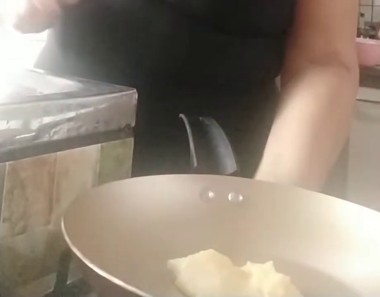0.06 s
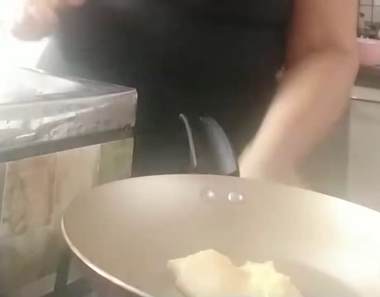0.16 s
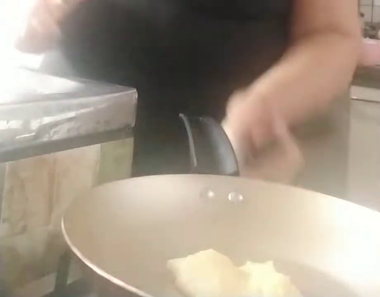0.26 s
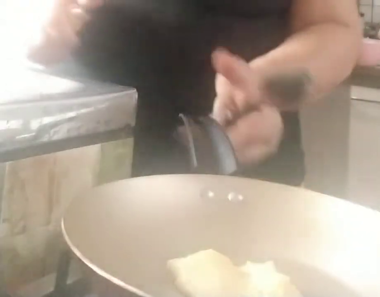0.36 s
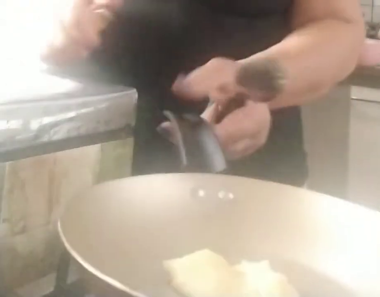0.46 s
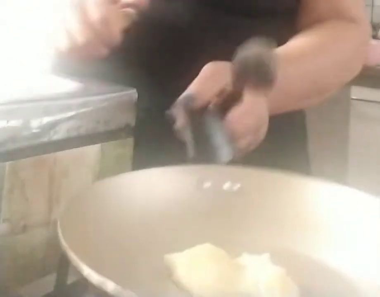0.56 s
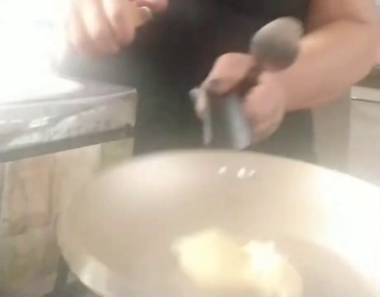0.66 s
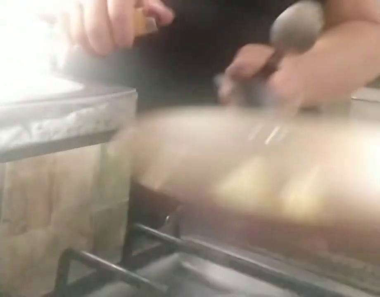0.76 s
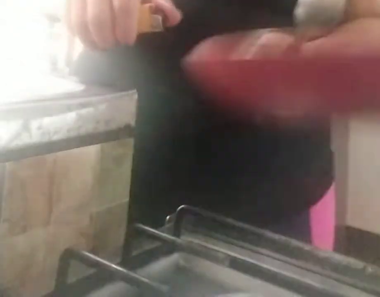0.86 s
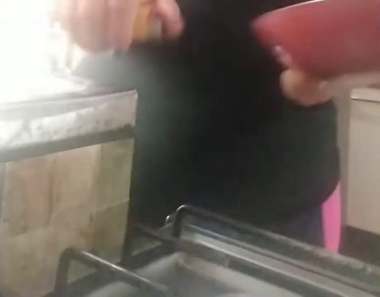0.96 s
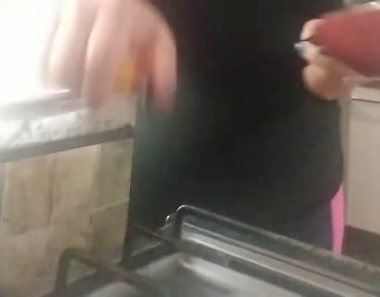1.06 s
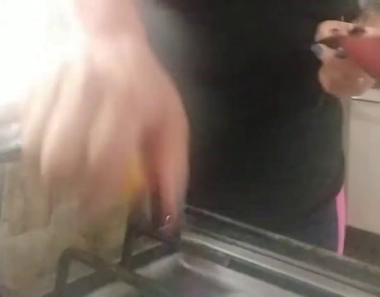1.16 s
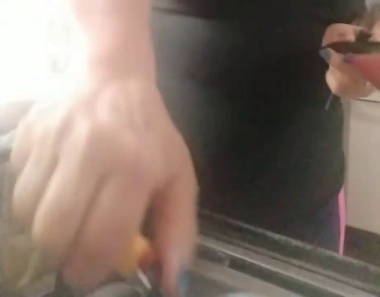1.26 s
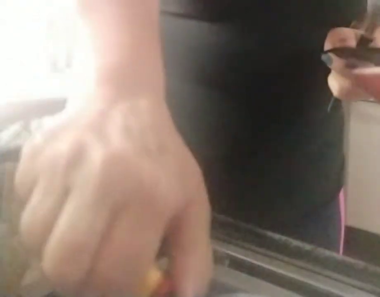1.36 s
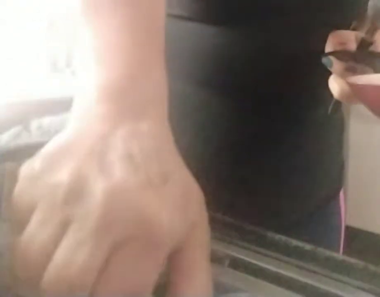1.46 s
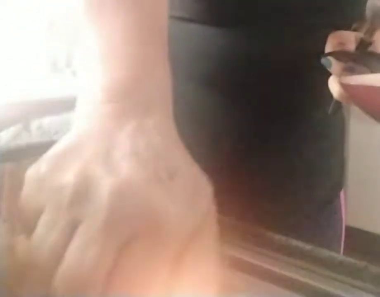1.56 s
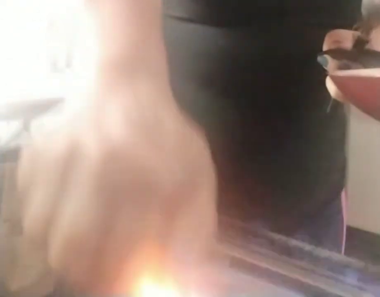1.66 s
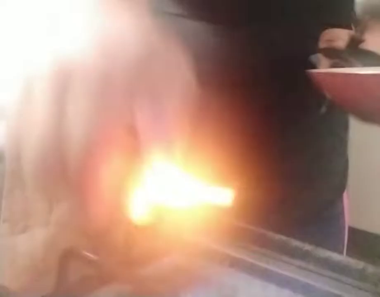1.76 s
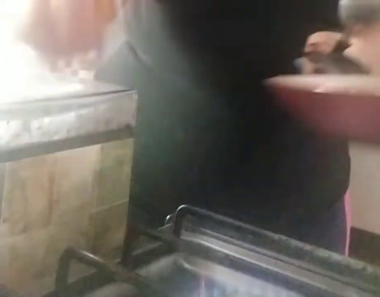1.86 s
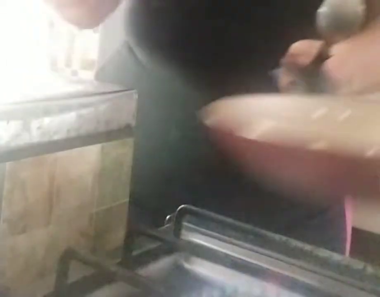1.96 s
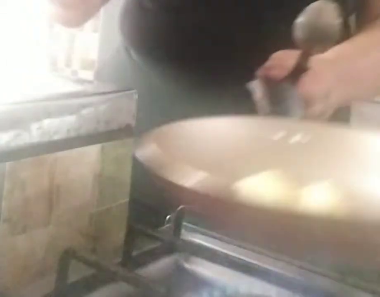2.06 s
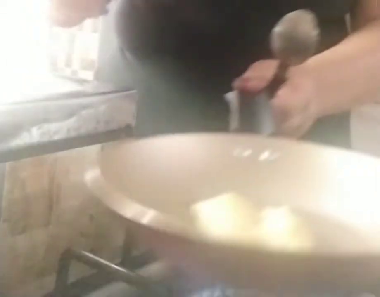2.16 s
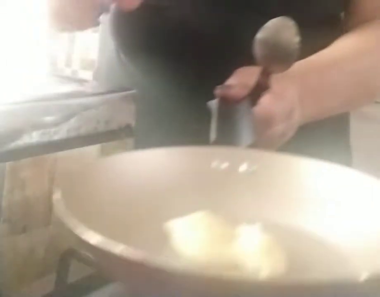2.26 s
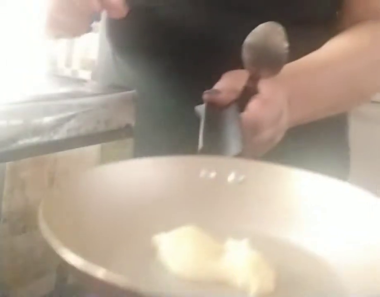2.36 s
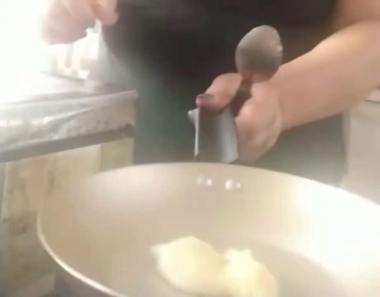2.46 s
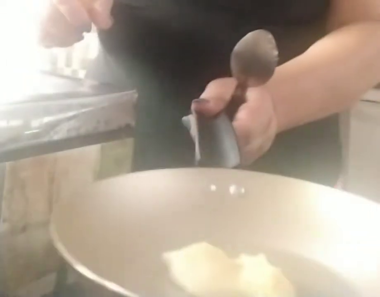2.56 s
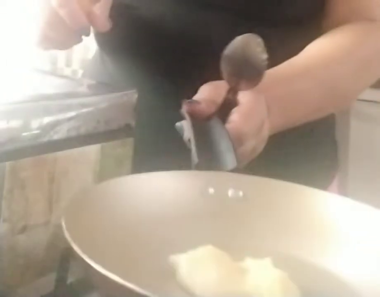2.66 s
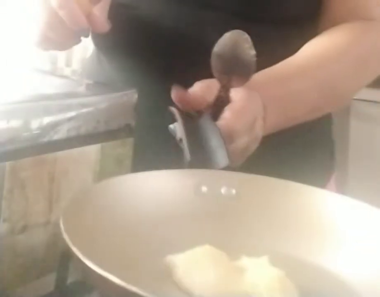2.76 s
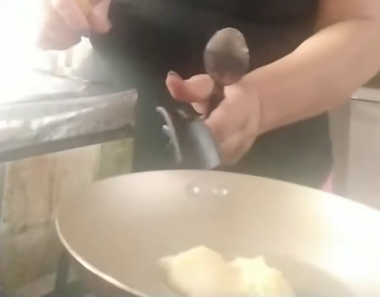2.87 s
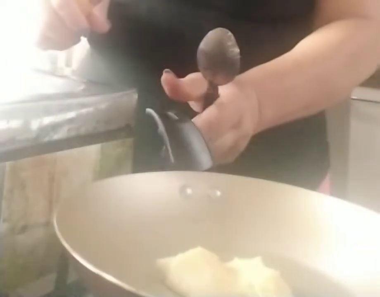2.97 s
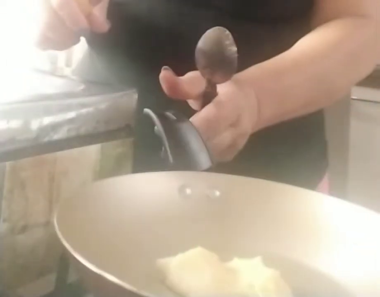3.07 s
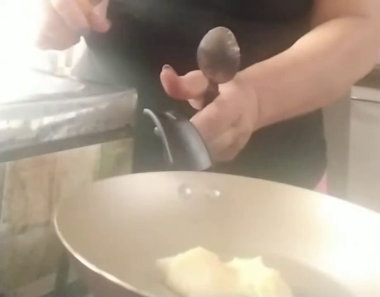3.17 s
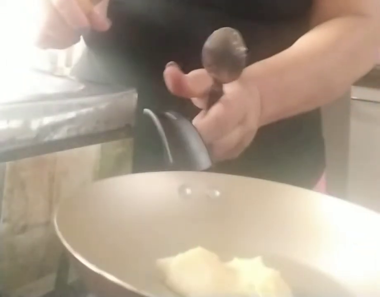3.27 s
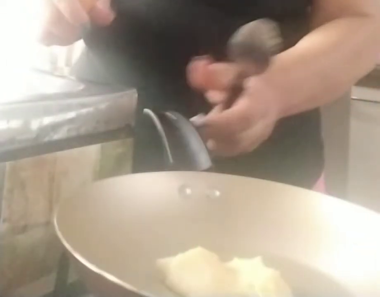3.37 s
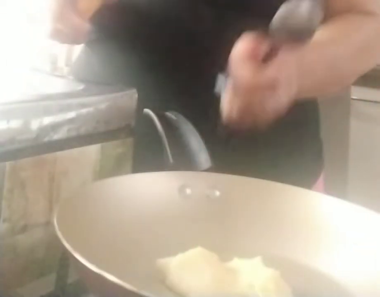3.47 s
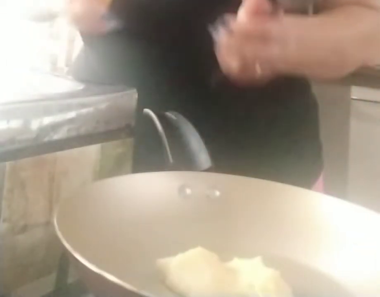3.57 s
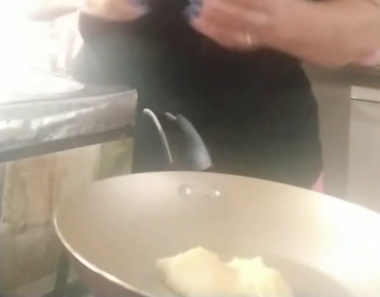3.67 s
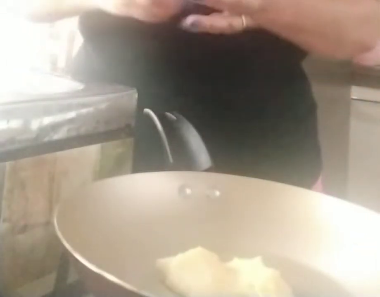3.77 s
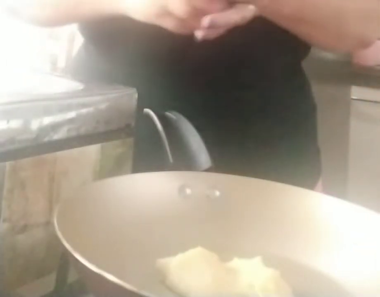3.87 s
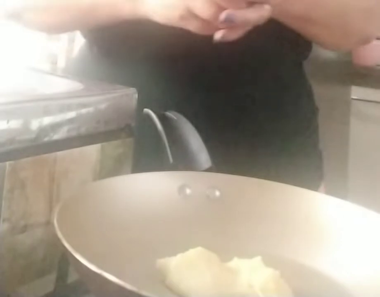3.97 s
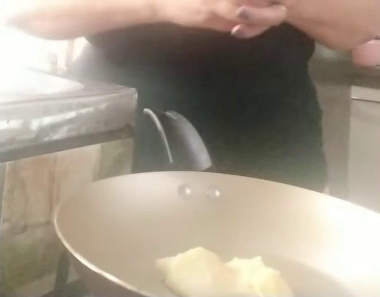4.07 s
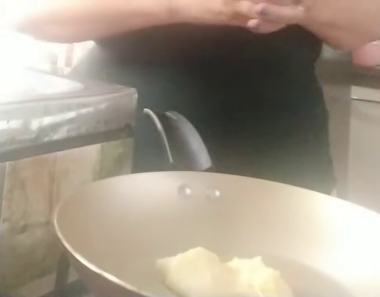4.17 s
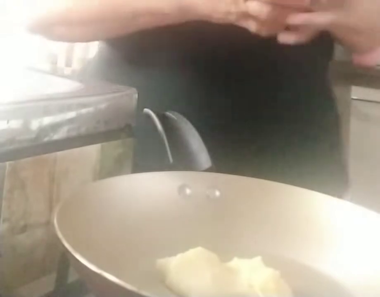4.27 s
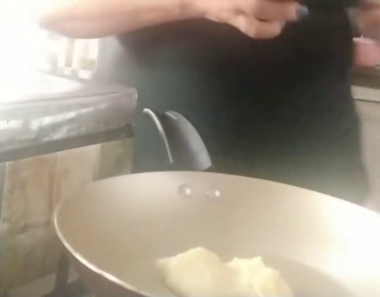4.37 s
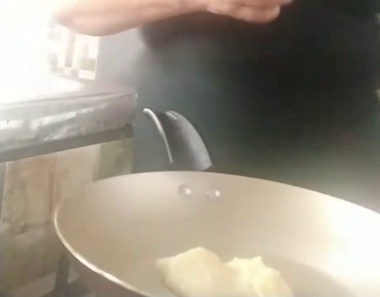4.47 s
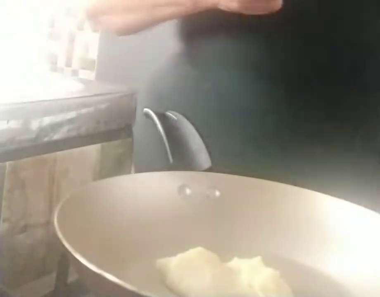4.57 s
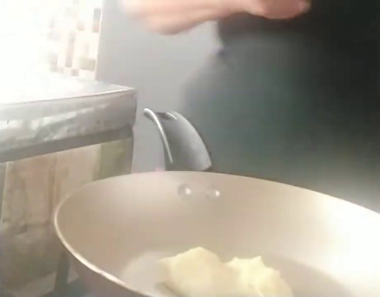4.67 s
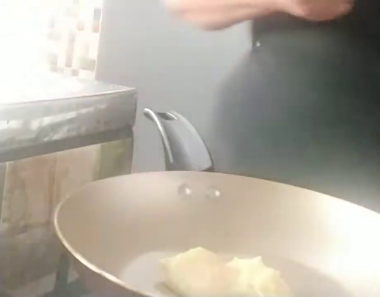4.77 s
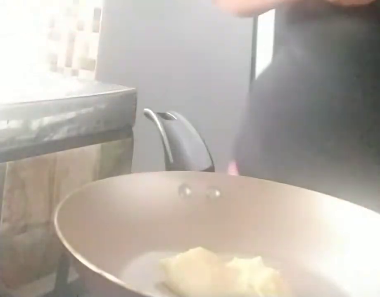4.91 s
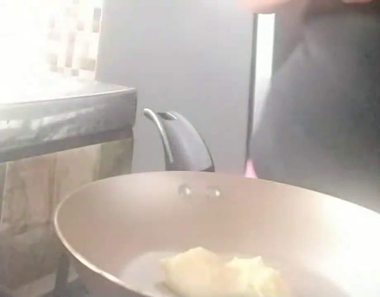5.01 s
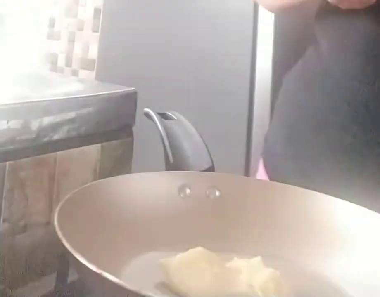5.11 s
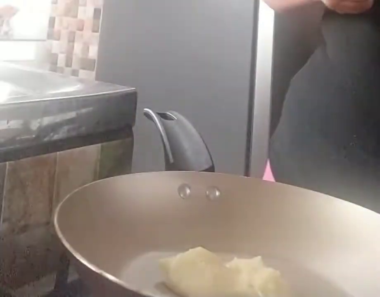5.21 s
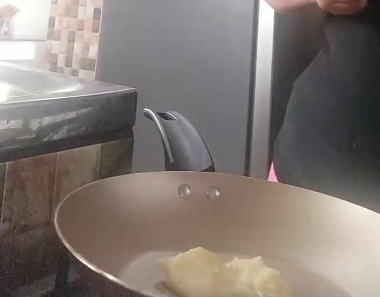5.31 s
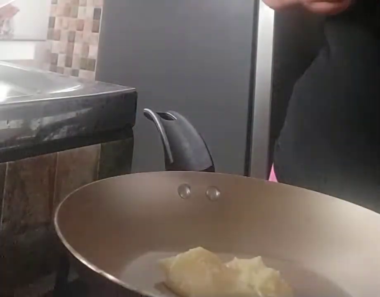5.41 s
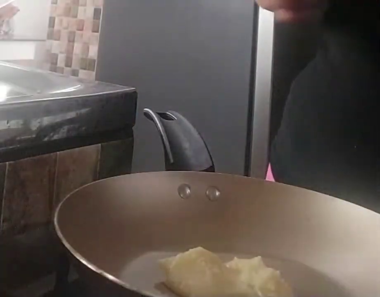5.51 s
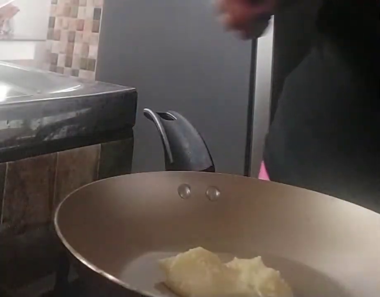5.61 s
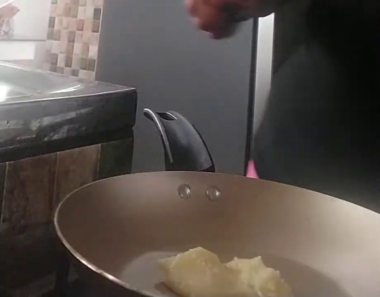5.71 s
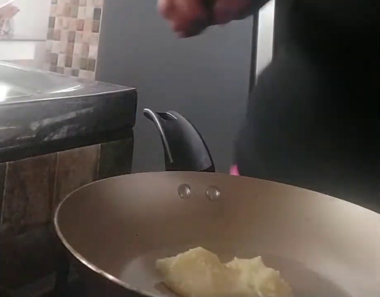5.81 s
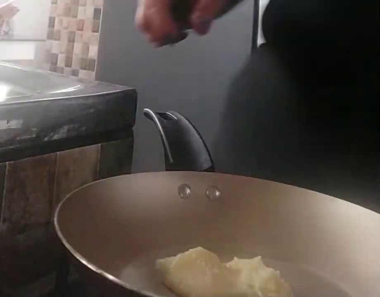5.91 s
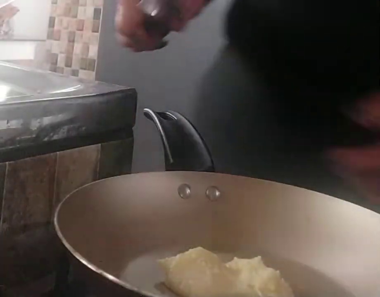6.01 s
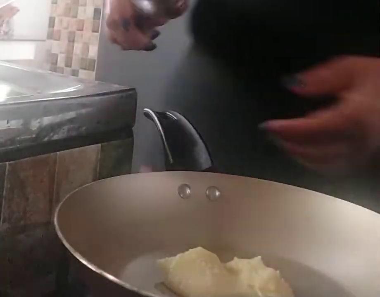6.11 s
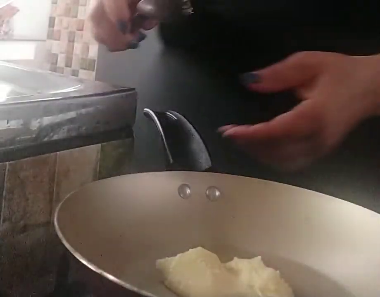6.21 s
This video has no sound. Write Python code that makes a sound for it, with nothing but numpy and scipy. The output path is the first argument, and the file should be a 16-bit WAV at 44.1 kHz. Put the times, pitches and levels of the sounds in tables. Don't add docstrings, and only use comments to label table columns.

```python
import sys
import numpy as np
from scipy import signal
from scipy.fft import rfft, irfft
from scipy.io import wavfile

SR = 44100
rng = np.random.default_rng(int(sys.argv[2]) if len(sys.argv) > 2 else 0)


def amplitude_ratio(level_db):
    exponent = np.asarray(level_db, float) / 20
    return 10 ** exponent


def digitize_waveform(pressure):
    field = np.atleast_2d(pressure).T
    bounded = np.clip(field, -1, 1)
    quanta = np.round(bounded * 32767).astype(np.int16)
    wavfile.write(sys.argv[1], SR, quanta)


N = 275625
TIME_S = np.arange(N) / SR

# start in seconds, peak in dB.
FLINT_SNAPS = [
    (1.578, -19),
    (1.5818, -3.5),
]
FLINT_CRACK_HZ, FLINT_BODY_HZ, FLINT_DULL_DB, FLINT_CONTACT_MS = 8400, 5650, 1.5, 6.5
GRIND_START_S, GRIND_LENGTH_S, GRIND_DB, GRIND_RISE_DB_PER_S = 1.527, 0.051, -47, 224
THUMB_RUB_DB = -1
SPARK_START_S, SPARK_DB, SPARK_FADE_DB_PER_S = 1.595, -33, 154

# swell in seconds, level in dB, fade in dB per second.
FLAME_POP = (0.015, -33.5, 177)
CATCH_S, SWELL_S, BURN_S, PUFF_DB, PUFF_FADE_DB_PER_S = 1.592, 0.024, 0.036, -33.5, 227
PUFF_EDGE_HZ, PUFF_ROLL_HZ, PUFF_CLIMB_OCT_PER_S, PUFF_CLIMB_S = 62, 300, 19, 0.105

# start in seconds, clack peak in dB, thump in dB, edge in dB, left-right in dB.
BLOWS = [(0.139, -35.5, -30.5, -31, -0.5), (0.436, -28.5, -39, -39, 0), (1.283, -27, -41, -29.5, 4),
         (1.29, -29, -32, -33, 4), (1.299, -38, -24, -50, -1), (2.461, -21, -45, -17.5, 5),
         (2.655, -19.5, -48, -24, 3.5), (2.667, -21, -37, -22.5, -5), (2.691, -45, -29, -53, 10),
         (2.713, -51, -47, -50, 4), (2.968, -33, -43, -57, 2), (3.01, -54, -37, -55, 7)]
BLOW_CONTACT_MS = 13

# frequency in Hz, level in dB, t60 in seconds.
PAN_MODES = [(163, -7.5, 0.083), (306, -8.5, 0.053), (338.4, -10.5, 0.13), (415, -15, 0.17),
             (933, -14, 0.27), (993, -8, 0.16), (1114, -9, 0.052), (1393, -15.5, 0.051),
             (2028, -6.5, 0.057), (2708, -1, 0.027), (2790, -6, 0.027), (3820, -7, 0.055), (5030, -23, .07),
             (7100, -19, .07), (8700, -25, 0.14), (10700, -19, .08)]
# start in seconds, level in dB.
PAN_STRIKES = [
    (0.14, -53),
    (0.435, -46),
    (2.461, -36.5),
    (2.519, -49),
    (2.653, -40),
    (2.69, -47),
    (2.969, -48),
]
# start in seconds, length in seconds, rub in dB, sag in dB per second,
# bright share in dB.
SLIDES = [
    (0.144, 0.033, -44.5, 100, -18),
    (0.437, 0.21, -45, -7, -12),
    (2.469, 0.158, -40, 22, -10),
    (2.663, 0.031, -29.5, 155, -12),
    (2.968, 0.037, -38.5, 100, -23),
]
SLIDE_STOP_DB_PER_S = 293
# frequency in Hz, level in dB, t60 in seconds.
HOB_MODES = [(176.2, -1, 0.29), (253, -13.5, 1), (440, -12.5, 0.53), (1044, -19, 0.69), (1285, -7, 0.54),
             (1410, -6, 0.29), (1750, -6.5, 0.32), (1940, 12, 0.082), (2159, -7.5, 0.45), (2230, -4, 0.28),
             (2476, -4, 0.13), (2650, -1.5, 0.13), (2790, -5.5, 0.067), (5211, -24, 0.33),
             (5270, -24, 0.15), (5480, -23, .12), (7560, -24, .25), (10600, -1.5, 0.16)]
# start in seconds, level in dB.
HOB_STRIKES = [
    (1.287, -34),
]
HOB_PAN_DB = 5
SOFT_BELOW_DB, SOFT_LOSS_DB_PER_OCT_PER_DB = -36, 0.4
# start in seconds, frequency in Hz, level in dB, t60 in seconds.
AFTER_RINGS = [(1.287, 5310, -46.5, 0.14), (1.292, 5210, -53, 0.28), (1.69, 1044, -51.5, 0.31),
               (2.25, 2159, -73, .6), (2.461, 8700, -29, 0.07), (2.66, 319.3, -33, 0.27),
               (2.685, 415, -36, 0.24), (2.69, 194, -37.5, 0.099), (3.37, 2159, -65, 2.9),
               (5.234, 935, -36, 0.051), (5.236, 262, -48, 0.1)]

# start in seconds, bright peak in dB, dull part in dB, left-right in dB.
TICKS = [(1.8865, -31, -38.5, -2.1), (1.9068, -38, -36, 3), (2.514, -30, -26.5, -0.5),
         (2.1028, -32, -38.5, -5), (2.122, -35, -43, -5), (3.3385, -24, -36.5, -3), (3.3726, -23, -34, -1),
         (3.4012, -33, -47, -9), (3.989, -42, -38, -2), (4.783, -20, -38.5, -1.5), (5.796, -42, -48, -7.0),
         (6.136, -27, -33.5, -3.5)]
TICK_BODY_HZ, TICK_CONTACT_MS = 2600, 5.5
# start in seconds, crack peak in dB, dull part in dB.
COUNTER_SNAPS = [
    (5.2257, -15.5, -17),
    (5.233, -8.5, -11),
    (5.2402, -15.5, -40),
    (5.2497, -27, -20),
]
DROP_CRACK_HZ, DROP_BODY_HZ, DROP_CONTACT_MS = 7600, 4000, 9.1
SHIVER_START_S, SHIVER_DB, SHIVER_FADE_DB_PER_S, SHIVER_DULL_DB = 5.24, -24, 131, -7.5
# start in seconds, peak in dB, frequency in Hz, t60 in
# seconds.
KNOCKS = [
    (1.582, -33.5, 420, .03),
    (2.119, -34.5, 574, 0.05),
    (3.968, -29.5, 533, 0.023),
    (5.029, -42, 550, 0.035),
    (5.807, -33, 543, 0.026),
    (6.136, -25.5, 538, 0.034),
          (4.6, -35.5, 1500, 0.017),
    (3.4, -48, 120, 0.091),
    (2.17, -53.5, 96, 0.094),
    (.56, -48, 72, 0.13),
]
# start in seconds, length in seconds, level in dB,
# fade in dB per second, dull share in dB.
RUSTLES = [
    (0.14, 0.0091, -44.5, 134, -9),
    (1.885, .085, -43, 502, -9),
    (2.05, 0.088, -46.5, 84, -6.5),
    (2.827, .1, -51, 150, -0.5),
    (3.336, .03, -35.5, 218, -10.5),
    (4.657, 0.062, -55.5, 105, 2),
    (4.781, .01, -34.5, 140, -13),
    (5.008, 0.014, -48.5, 300, -12),
]
RUSTLE_PAN_DB = -4

# time in seconds, level in dB.
GAS_FLOW = [
    (0.0, -0.5),
    (1.2, -0.5),
    (1.9, -0.2),
    (3.0, 0.1),
    (4.5, -0.5),
    (6.25, 0.2),
]
# frequency in Hz, width in Hz, level in dB.
TUBE_MODES = [(542, 52, -3.5), (581.5, 142, -0.5), (805, 145, -14.5), (1531, 257, -9.5), (2512, 139, -8),
              (2885, 150, -12.5), (3330, 80, -11), (4062, 81, -8)]
# frequency in Hz, level in dB per Hz.
JET_SPECTRUM = [(700, 4), (1100, -6), (3300, -1.5), (3750, -56.5), (4300, -4.5), (7000, -4), (9000, -1),
                (11000, -8.5), (16000, -17.5)]
ROAR_DB, HISS_DB = -53, -57.5
# frequency in Hz, level in dB per Hz.
RUMBLE_SPECTRUM = [(12, -40), (20, 7), (68, -0.5), (87, -6.5), (226, 1.5), (282, -15.5), (450, -36),
                   (580, -48), (990, -120)]
RUMBLE_DB = -61

# frequency in Hz, left-right correlation.
LIKENESS = [(60, 0.69), (150, 0.52), (380, 0.93), (950, 0.53), (2380, 0.31), (5980, 0.21), (15000, 0.01)]
# frequency in Hz, t60 in seconds.
ROOM_T60 = [(100, 0.68), (500, 0.23), (2000, 0.41), (8000, 0.42), (15000, 0.17)]
ROOM_DB = -8
# resonance in Hz, width in Hz, lift in dB.
PORTS = [
    (9800, 640, 5),
    (8970, 1260, 10.5),
]


def rms_one(x):
    return x / np.sqrt(np.mean(x ** 2) + 1e-20)


def peak_at(x, db):
    return amplitude_ratio(db) * x / np.max(np.abs(x))


def at_hz(points, hz):
    point_hz, value = np.transpose(points)
    return np.interp(np.log(hz), np.log(point_hz), value)


def band(x, low_hz, high_hz):
    return signal.sosfilt(signal.butter(2, [low_hz, min(high_hz, 0.45 * SR)], "band", fs=SR, output="sos"), x)


def drift(rate_hz):
    return np.interp(TIME_S * rate_hz, np.arange(400), rng.standard_normal(400))


def ring(clicks, hz, t60_s):
    r = amplitude_ratio(-60 / (max(t60_s, 0.002) * SR))
    w = 2 * np.pi * hz / SR
    return signal.lfilter([0, np.sin(w)], [1, -2 * r * np.cos(w), r * r], clicks + 1e-18)


def wide_noise(size, spectrum=((1, 0), (2, 0))):
    hz = np.fft.rfftfreq(size, 1 / SR) + 1
    alike = np.clip(at_hz(LIKENESS, hz), -1, 1)
    mid, side = rfft(rng.standard_normal((2, size)))
    pair = np.sqrt(1 + alike) * mid + np.sqrt(1 - alike) * side * [[1], [-1]]
    return rms_one(irfft(pair * amplitude_ratio(at_hz(spectrum, hz)), size))


def grainy(grains_per_s, spread_db, bed):
    grains = (rng.random(N) < grains_per_s / SR) * amplitude_ratio(spread_db * np.minimum(rng.exponential(1, N), 4))
    strength = bed + rms_one(signal.lfilter([1], [1, -0.985], grains))
    return rms_one(wide_noise(N) * strength)


def balance(pan_db):
    return amplitude_ratio(np.array([[pan_db / 2], [-pan_db / 2]]))


def add(out, start_s, sound, pan_db=0):
    i = round(start_s * SR)
    out[:, i:i + sound.shape[-1]] += (sound * balance(pan_db))[:, :N - i]


def stroke(start_s, length_s, db, fade_db_per_s, sag_db_per_s=0, attack_s=0.0012):
    t = TIME_S - start_s
    held_s = np.clip(t - attack_s, 0, length_s)
    fading_s = np.maximum(t - attack_s - length_s, 0)
    return np.clip(t / attack_s, 0, 1) * amplitude_ratio(db - sag_db_per_s * held_s - fade_db_per_s * fading_s)


def contact(ms):
    t = np.arange(4096) / SR
    return wide_noise(4096) * np.exp(-t * 2300 / max(ms, 0.5)) * np.minimum(t / 0.00021, 1)


def snap(crack_db, crack_hz, dull_db, body_hz, ms):
    force = contact(ms)
    dull = rms_one(band(force, 1800, 6500)) + 0.9 * rms_one(ring(force, body_hz, t60_s=0.009))
    crack = band(force, crack_hz * 0.72, crack_hz * 1.4)
    return peak_at(crack, crack_db) + peak_at(dull, dull_db)


def flint():
    out = np.zeros((2, N))
    high = signal.butter(2, 3800, "high", fs=SR, output="sos")
    for s, db in FLINT_SNAPS:
        hit = snap(db, FLINT_CRACK_HZ, db + FLINT_DULL_DB, FLINT_BODY_HZ, FLINT_CONTACT_MS)
        add(out, s, signal.sosfilt(high, hit), pan_db=4)
    return out


def flint_wheel():
    rough = grainy(900, spread_db=3, bed=1)
    grind = stroke(GRIND_START_S, GRIND_LENGTH_S, GRIND_DB, 900, -GRIND_RISE_DB_PER_S, attack_s=0.0069)
    teeth = rms_one(band(rough, 7600, 10800)) + 0.78 * rms_one(band(rough, 4900, 7700))
    thumb = amplitude_ratio(THUMB_RUB_DB) * rms_one(band(rough, 250, 1860))
    sparks = stroke(SPARK_START_S, 0, SPARK_DB, SPARK_FADE_DB_PER_S) * rms_one(band(rough, 3300, 9900))
    return amplitude_ratio(-5) * (grind * (teeth + thumb) + sparks)


def ignition():
    climb = 2 ** (PUFF_CLIMB_OCT_PER_S * np.clip(TIME_S - CATCH_S, 0, PUFF_CLIMB_S))
    edge_hz, roll_hz = PUFF_EDGE_HZ * climb, PUFF_ROLL_HZ * climb
    white = wide_noise(N)
    white = white + 0.68 * white.mean(axis=0)
    puff, power = 0, 0
    for hz in 100 * 1.6 ** np.arange(7):
        share = 1 / (1 + (hz / roll_hz) ** 2) / (1 + (edge_hz / hz) ** 5)
        puff = puff + share * rms_one(band(white, hz / 1.32, hz * 1.34))
        power = power + share ** 2
    swell = stroke(CATCH_S, BURN_S, PUFF_DB, PUFF_FADE_DB_PER_S, attack_s=SWELL_S)
    pop_swell_s, pop_db, pop_fade_db_per_s = FLAME_POP
    pop_gain = stroke(CATCH_S, 0, pop_db, pop_fade_db_per_s, attack_s=pop_swell_s)
    pop = pop_gain * np.sin(2 * np.pi * np.cumsum(edge_hz) / SR)
    return swell * amplitude_ratio(2 * drift(50)) * puff / np.sqrt(power) + pop


def blows():
    out = np.zeros((2, N))
    for s, clack_db, thump_db, edge_db, pan_db in BLOWS:
        thump = band(band(contact(BLOW_CONTACT_MS * 1.9), 130, 790), 110, 1560)
        clack = band(band(contact(BLOW_CONTACT_MS), 860, 4300), 510, 4950)
        edge = band(band(contact(BLOW_CONTACT_MS * 0.68), 6150, 10400), 6200, 13000)
        hit = peak_at(thump, thump_db) + peak_at(clack, clack_db) + peak_at(edge, edge_db - 2)
        add(out, s, hit, pan_db)
    return out


def struck(modes, strikes, rubbing=0):
    out = np.zeros((2, N))
    span = round(3.2 * SR)
    start_s, strike_db = np.transpose(strikes)
    at = [round(s * SR) for s in start_s]
    softness_db = np.minimum(strike_db - SOFT_BELOW_DB, 0)
    for hz, level_db, t60_s in modes:
        octaves = max(np.log2(hz / 1000), 0)
        db = strike_db + SOFT_LOSS_DB_PER_OCT_PER_DB * softness_db * octaves
        clicks = np.zeros((2, N))
        clicks[:, at] = amplitude_ratio(db + rng.normal(0, 0.72, (2, len(at))))
        out[:, :span] += amplitude_ratio(level_db) * ring((clicks + rubbing)[:, :span], hz, t60_s)
    return np.array([out[0], np.roll(out[1], 6)])


def pan():
    strokes = np.array([stroke(s, length_s, db, SLIDE_STOP_DB_PER_S, sag_db_per_s)
                        for s, length_s, db, sag_db_per_s, bright_db in SLIDES])
    rub = strokes.sum(axis=0)
    bright_rub = amplitude_ratio(np.array(SLIDES)[:, 4]) @ strokes
    rough = grainy(261, spread_db=1.2, bed=0.99)
    body = rms_one(band(rough, 108, 440)) + 0.78 * rms_one(band(rough, 410, 1600))
    bright = rms_one(band(band(rough, 6700, 10300), 6600, 11800))
    rasp = amplitude_ratio(-6) * rub * body + amplitude_ratio(-2.5) * bright_rub * bright
    drive = amplitude_ratio(-29.5) * rub * band(band(rough, 180, 5300), 138, 4000)
    return rasp + struck(PAN_MODES, PAN_STRIKES, drive)


def hob():
    return band(struck(HOB_MODES, HOB_STRIKES), 120, 16000) * balance(HOB_PAN_DB)


def grate_bars():
    out = np.zeros((2, N))
    click = np.eye(1, SR)[0]
    for s, hz, db, t60_s in AFTER_RINGS:
        add(out, s, amplitude_ratio(db) * ring(click, hz, t60_s), pan_db=-1.5)
    return out


def ticks():
    out = np.zeros((2, N))
    for s, bright_db, dull_db, pan_db in TICKS:
        add(out, s, snap(bright_db - 5.5, 7100, dull_db + 3.5, TICK_BODY_HZ, TICK_CONTACT_MS), pan_db)
    for s, crack_db, dull_db in COUNTER_SNAPS:
        add(out, s, snap(crack_db, DROP_CRACK_HZ, dull_db, DROP_BODY_HZ, DROP_CONTACT_MS), pan_db=-2)
    for s, db, hz, t60_s in KNOCKS:
        add(out, s, peak_at(ring(band(contact(1.6), hz / 2.6, hz * 2.1), hz, t60_s), db))
    return out


def shiver():
    rough = grainy(500, spread_db=3.5, bed=1.3)
    bright = rms_one(band(rough, 6800, 9000)) + 0.45 * rms_one(band(band(rough, 5500, 11000), 4500, 11500))
    dull = amplitude_ratio(SHIVER_DULL_DB + 4.5) * rms_one(band(rough, 1800, 5200))
    return stroke(SHIVER_START_S, 0, SHIVER_DB - 8.5, SHIVER_FADE_DB_PER_S) * (bright + dull)


def rustles():
    rough = grainy(400, spread_db=3, bed=1.5)
    bright = rms_one(band(rough, 7200, 11000))
    dull = rms_one(band(rough, 900, 4500))
    out = np.zeros((2, N))
    for s, length_s, db, fade_db_per_s, dull_db in RUSTLES:
        out += stroke(s, length_s, db - 9, fade_db_per_s) * (bright + amplitude_ratio(dull_db + 4.5) * dull)
    return out * balance(0.6 * RUSTLE_PAN_DB)


def gas():
    flow_db = np.interp(TIME_S, *np.transpose(GAS_FLOW))
    white = wide_noise(N)
    tube = np.zeros((2, N))
    for hz, width_hz, db in TUBE_MODES:
        mode = rms_one(ring(white, hz, 3.16 / width_hz)) * np.sqrt(width_hz)
        tube += amplitude_ratio(db + 1.63 * drift(25)) * mode
    roar = amplitude_ratio(ROAR_DB) * rms_one(band(tube, 362, 3380))
    hiss = amplitude_ratio(HISS_DB + drift(30)) * wide_noise(N, JET_SPECTRUM)
    return amplitude_ratio(flow_db) * (roar + hiss)


def house_rumble():
    return amplitude_ratio(RUMBLE_DB + 1.5 * drift(8.4)) * wide_noise(N, RUMBLE_SPECTRUM) * balance(-2.4)


def kitchen(x):
    size = 32768
    t = np.arange(size) / SR
    noise = wide_noise(size)
    edges_hz = 60 * 2.0 ** np.arange(9)
    echo = np.zeros((2, size))
    for low_hz, high_hz in zip(edges_hz, edges_hz[1:]):
        t60_s = at_hz(ROOM_T60, np.sqrt(low_hz * high_hz))
        echo += band(noise, low_hz, high_hz) * amplitude_ratio(-60 * t / t60_s)
    echo *= np.clip((t - 0.003) / 0.011, 0, 1)
    return signal.fftconvolve(x, echo / np.sqrt(np.sum(echo ** 2) / 2), axes=1)[:, :N]


def scene():
    snapped = flint()
    lit = flint_wheel() + ignition()
    close = blows() + pan() + hob() + grate_bars() + ticks()
    to_room = close + amplitude_ratio(-20) * snapped + band(lit, 210, 16000)
    echoes = amplitude_ratio(ROOM_DB) * kitchen(to_room)
    return snapped + lit + close + shiver() + rustles() + gas() + house_rumble() + echoes


def top_cut(x):
    return signal.sosfilt(signal.butter(12, 15300, fs=SR, output="sos"), x)


def record(dry):
    lifted = []
    for x, (hz, width_hz, lift_db) in zip(dry, PORTS):
        b, a = signal.iirpeak(hz, hz / width_hz, fs=SR)
        lifted.append(x + (amplitude_ratio(lift_db) - 1) * signal.lfilter(b, a, x))
    return top_cut(np.tanh(np.array(lifted)))


dry = scene()
out = record(dry)
digitize_waveform(out)
```